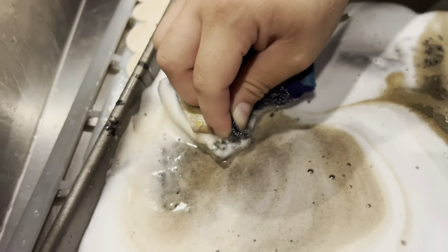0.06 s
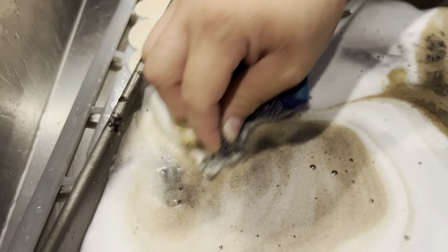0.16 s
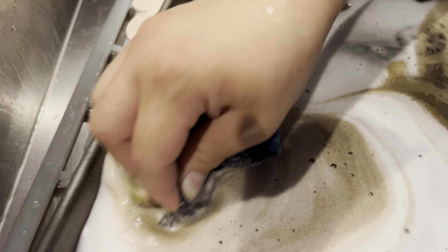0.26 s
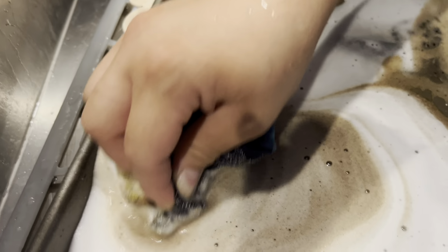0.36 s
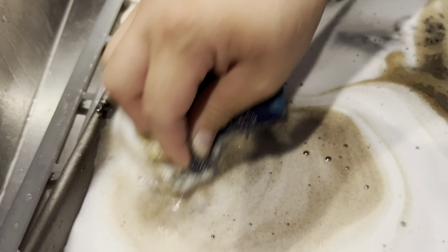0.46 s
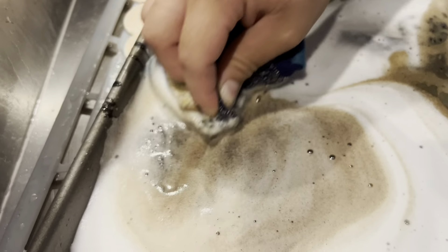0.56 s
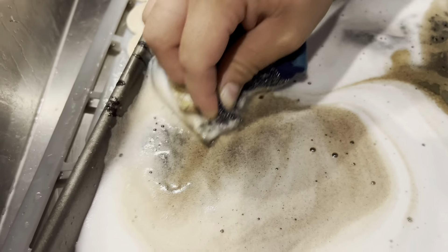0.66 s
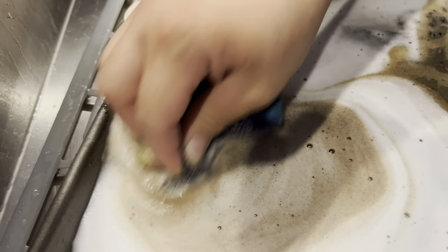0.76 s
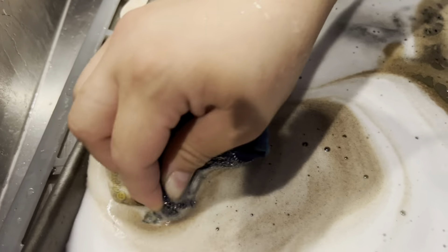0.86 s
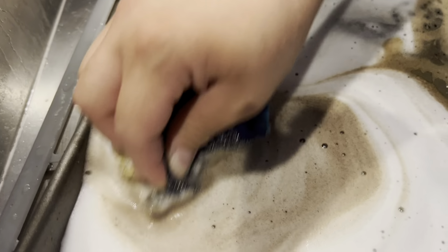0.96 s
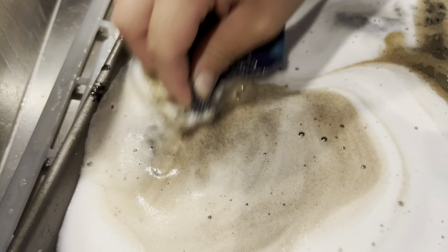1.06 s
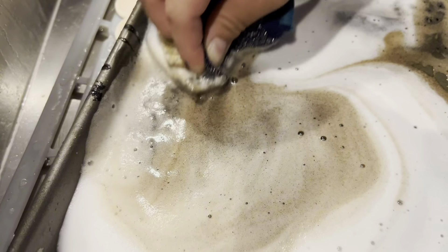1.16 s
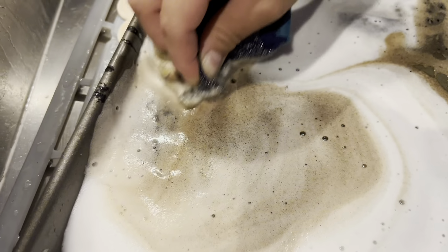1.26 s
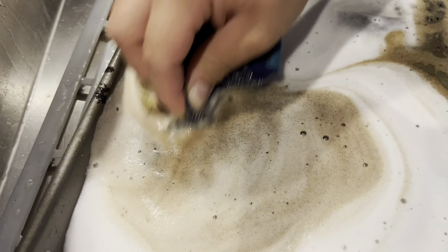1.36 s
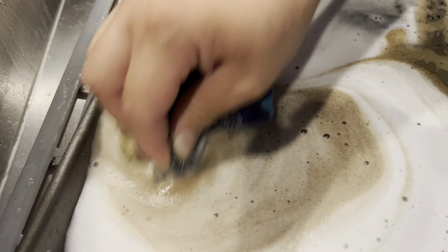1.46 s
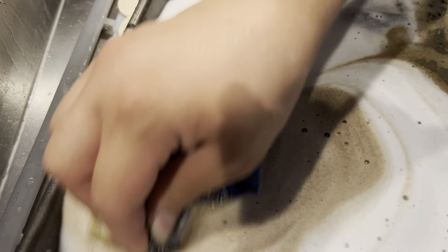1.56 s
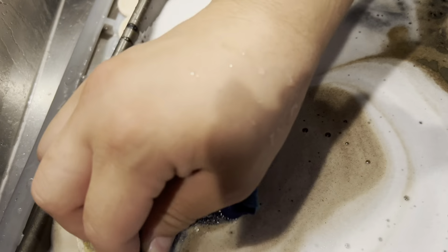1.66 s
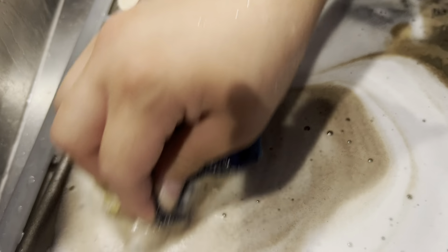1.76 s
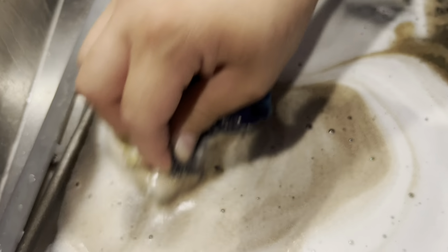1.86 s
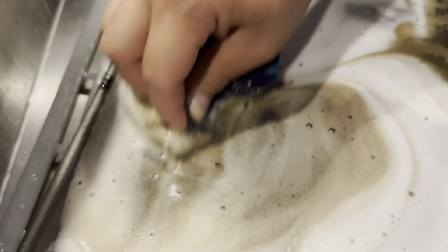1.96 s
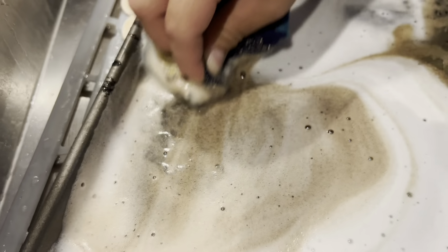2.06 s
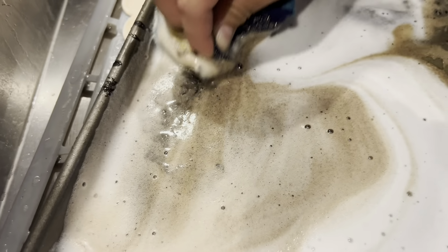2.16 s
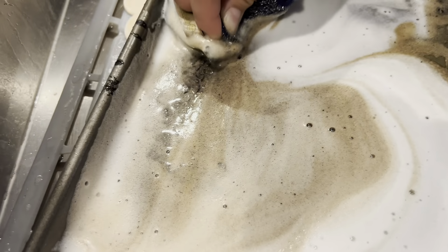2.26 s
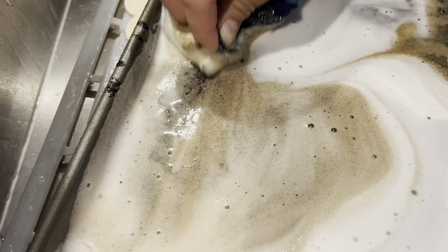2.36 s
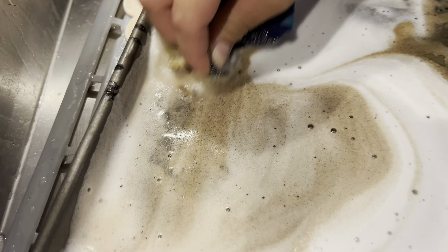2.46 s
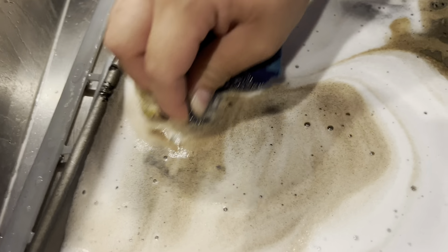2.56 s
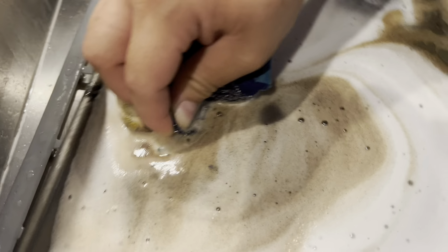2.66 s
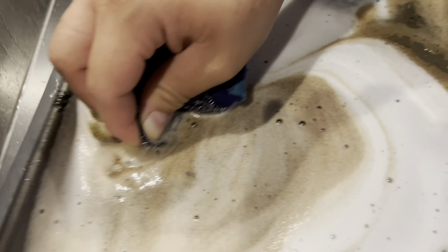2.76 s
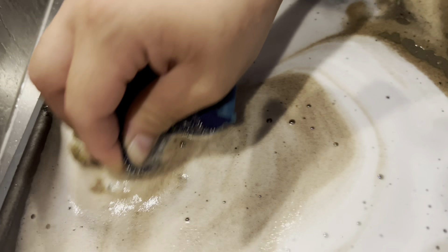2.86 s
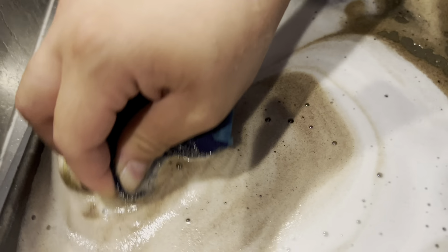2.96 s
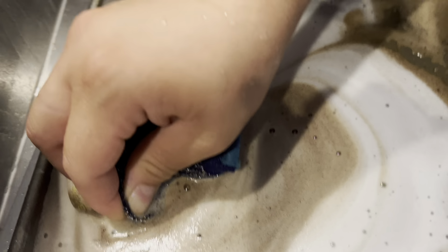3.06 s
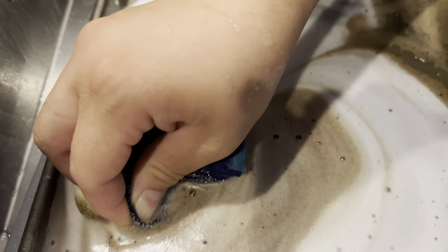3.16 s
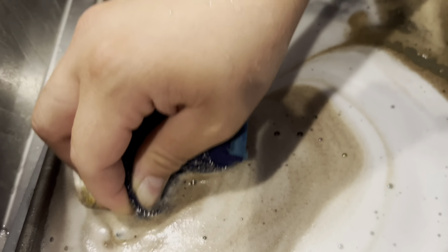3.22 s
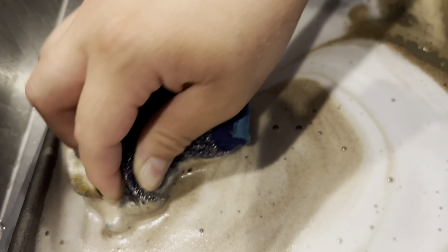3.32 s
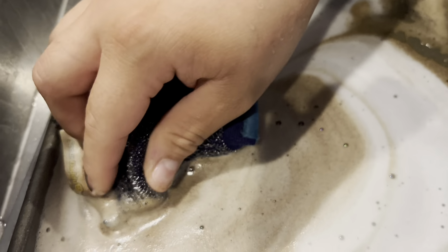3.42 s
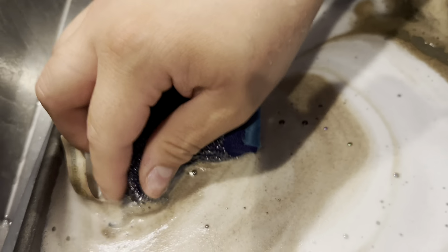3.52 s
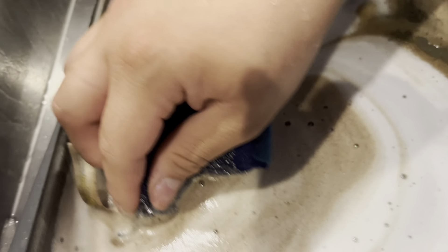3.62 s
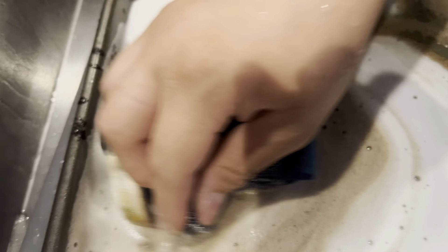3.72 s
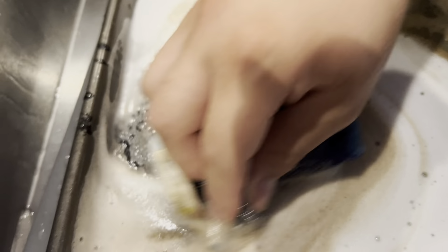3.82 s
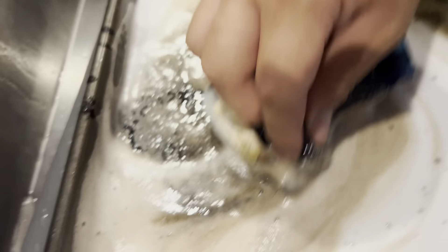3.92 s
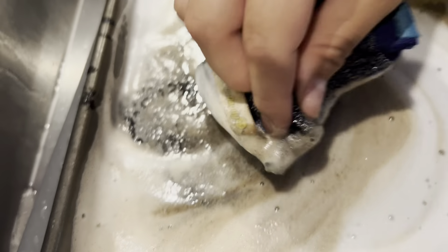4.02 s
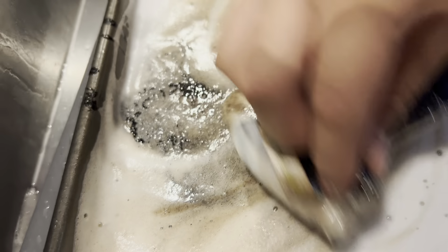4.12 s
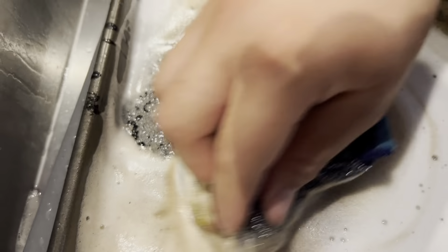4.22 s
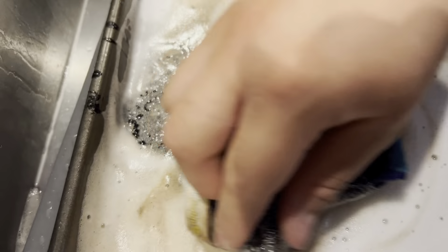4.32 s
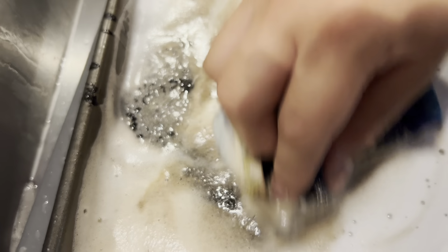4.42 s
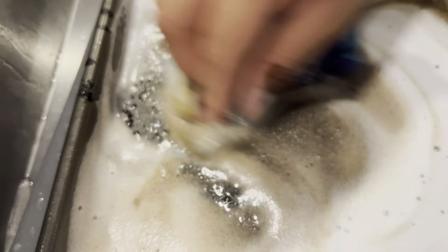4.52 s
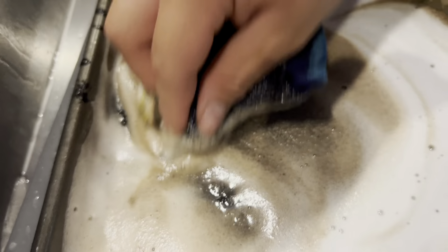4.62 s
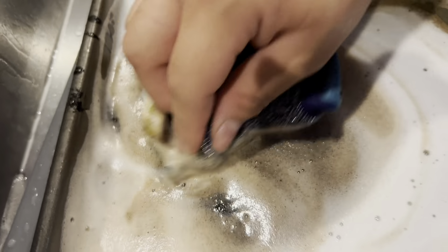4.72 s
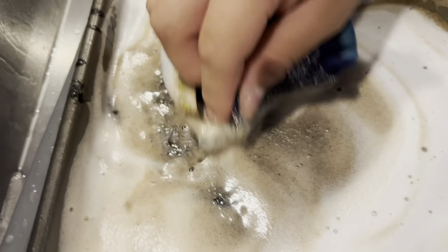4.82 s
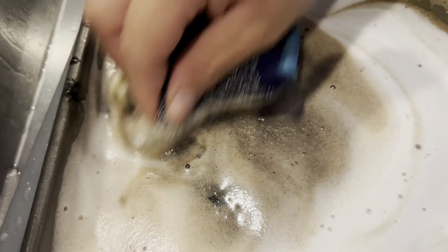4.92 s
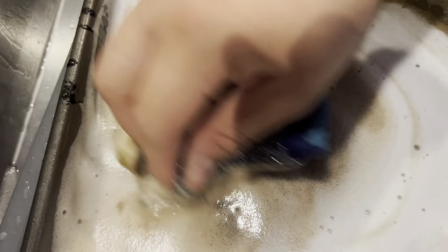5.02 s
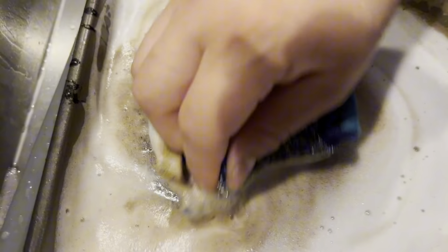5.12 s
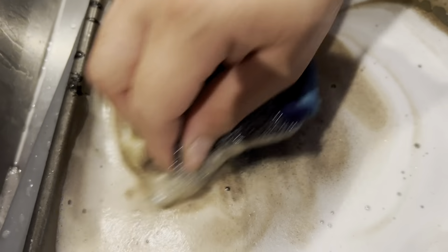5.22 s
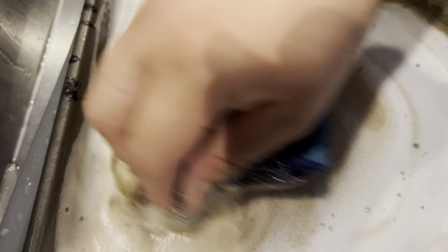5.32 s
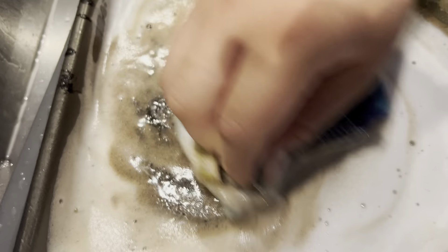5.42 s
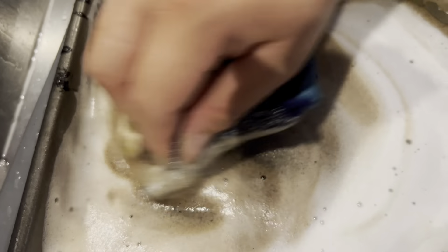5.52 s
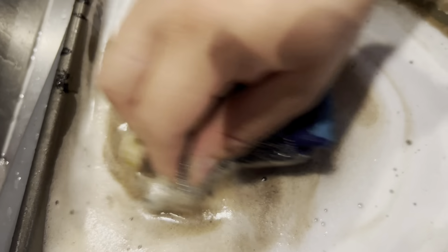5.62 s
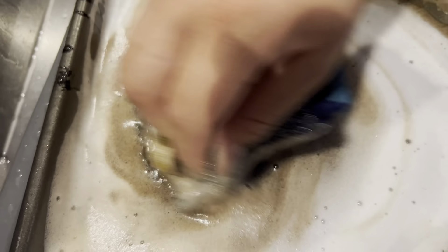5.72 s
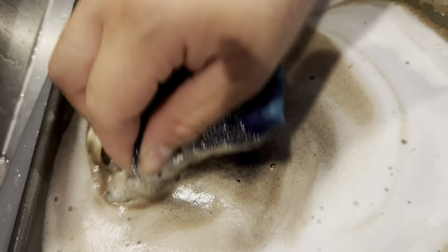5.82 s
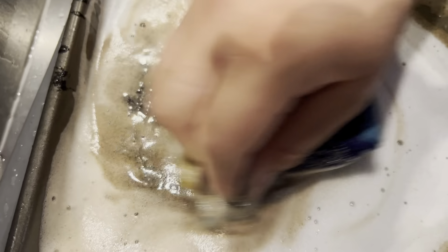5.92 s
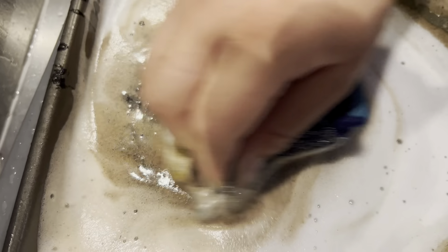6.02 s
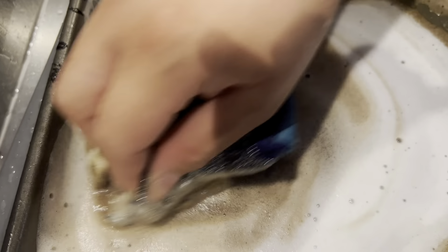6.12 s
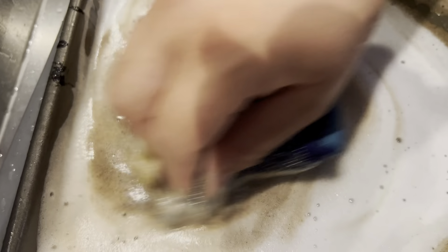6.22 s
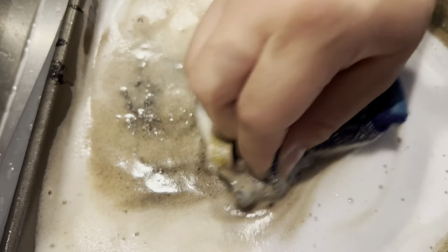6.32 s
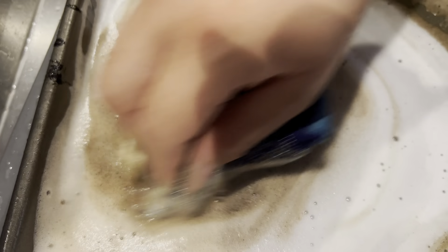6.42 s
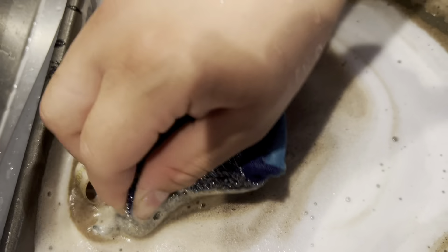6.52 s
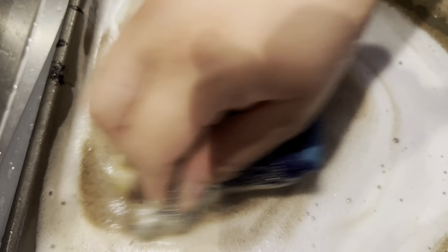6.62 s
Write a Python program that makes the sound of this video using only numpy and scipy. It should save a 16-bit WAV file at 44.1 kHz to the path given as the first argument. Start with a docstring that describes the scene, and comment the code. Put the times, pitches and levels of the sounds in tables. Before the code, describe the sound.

An abrasive sponge scrapes wet metal very near the microphone. Each stroke swells, glides and fades at its turn, combining a bright fibre hiss, a mid-range metallic rasp and dull low shaking of the sheet. About three long strokes every second come first, then a light, quiet lull with tiny ticks, then rapid vigorous scrubbing in a small, dry kitchen space.

```python
"""A scouring sponge scrubs a soapy steel baking sheet in a sink: long strokes, a light pause, then quick ones.
Each stroke speeds up, glides and slows to the turn; scrape, hiss and rumble follow its speed.
Slipping fibres are noise impulses that hiss, rasp and ring the damped sheet; slow flexing modes make the rumble.
Along the way the sponge judders into short gliding groans or jolts the sheet, and the sheet ticks on the sink.
Soap bubbles burst as short decaying sines over a faint noise floor; all is heard close by, in stereo."""
import sys
import numpy as np
from scipy import signal
from scipy.fft import rfft, irfft, next_fast_len
from scipy.io import wavfile
from scipy.ndimage import uniform_filter1d, map_coordinates

SR = 44100
rng = np.random.default_rng(int(sys.argv[2]) if len(sys.argv) > 2 else 0)


def bounce(signal):
    """Save signal as a 16-bit WAV file at the path given by the first command-line argument."""
    frames = np.transpose(np.atleast_2d(signal))
    limited = np.clip(frames, -1, 1)
    pcm = np.round(limited * 32767).astype(np.int16)
    wavfile.write(sys.argv[1], SR, pcm)


N = 294588

# bending modes of the wet sheet: (f/Hz, width/Hz, relative level/dB, left-right/dB, left leads/rad)
SHEET_MODES = [(464.4, 76, -1, 15, 2), (546, 58, -3, 5.5, 1), (692, 30, -1.5, 13, 1.5), (867, 50, 2, 3, -2),
               (976, 122, -4, -6.5, 0.23), (1038, 90, 2, 7, 0), (1107, 24, -6, 4, -0.2),
               (1245, 23, -10.5, -2, -0.8), (1406, 9, -4, 10, -1.5), (1753, 170, -5, 7, 2),
               (2366, 80, -11.5, 2, 1.5), (2440, 19, -9.5, -3, 0.5), (3310, 89, -15, 15, -2),
               (3576, 48, -20, 12, 1), (5010, 175, -13, 6, 1.5)]
# colour of the damped metal: (f/Hz, relative density/dB)
METAL_COLOUR = [(150, 3), (330, -11.5), (450, -1.5), (800, -1), (1100, 1.5), (1400, -1), (2000, -15),
                (3000, -25), (12000, -45)]
# colour of the rasping contact: (f/Hz, relative density/dB)
RASP_COLOUR = [(600, -13.5), (1100, -11.5), (1500, -1.5), (2000, -2), (2700, -4.5), (3600, -7.5),
               (6000, -14.5), (12000, -32)]
# the heavy sheet follows the hand a little late
RUMBLE_LAG_S = 0.013


def amp(db):
    """dB to gain."""
    return 10 ** (np.asarray(db) / 20)


def rms(x):
    """Mean strength of a signal."""
    return np.sqrt(np.mean(x ** 2) + 1e-20)


def unit(x):
    """x brought to rms 1."""
    return x / rms(x)


def along(points, hz):
    """Values between (f/Hz, value) points, on a log frequency axis."""
    f, v = np.transpose(points)
    return np.interp(np.log(hz + 1), np.log(f + 1), v)


def wobble(rate):
    """A smooth random curve, rate knots a second."""
    knots = rng.standard_normal(int(N * rate / SR) + 4)
    return map_coordinates(knots, [np.arange(N) * rate / SR])


def filtered(x, response):
    """x times a complex response of frequency."""
    size = next_fast_len(N + SR // 2)
    f = np.fft.rfftfreq(size, 1 / SR)
    return irfft(rfft(x, size) * response(f), size)[..., :N]


def resonance(f, hz, width):
    """Causal response of one damped mode."""
    return 1j * f * width / (hz * hz - f * f + 1j * f * width)


def placed(balance_db, lead):
    """Left and right gains for a level difference and a phase lead."""
    left = amp(balance_db / 2) * np.exp(.5j * lead)
    return np.array([left, 1 / left]) / np.sqrt((amp(balance_db) + amp(-balance_db)) / 2)


def heard(pair, spectrum):
    """Two unrelated signals, coloured and blended into left and right with set likeness, balance and phase;
    opposite in phase around 10 kHz; rms 1."""
    # left-right likeness: (f/Hz, likeness 0-1)
    alike = [(200, 1), (400, 0.6), (2500, 0.042), (3500, 0.21), (6000, 0.095), (7200, 0.49), (8800, 0.29),
             (9100, 1), (10900, 1), (11600, 0.074), (12200, 0.65), (12500, 0.78), (14300, 1), (14900, .55)]
    # left-right level difference: (f/Hz, balance/dB)
    balance = [(200, -3.5), (450, 4.5), (900, 3), (1300, -3), (1750, 1.5), (2500, 0), (3500, 2.5),
               (4600, 7.5), (5600, 6.5), (6800, 0.8), (9000, 1.78), (12000, -2.5)]
    # left-right phase: (f/Hz, left leads/rad)
    left_lead = [(300, 0), (1000, -1.1), (1700, 2), (3500, 2.5), (4600, 0), (6900, 0.5), (8800, -1.6),
                 (9100, -np.pi), (10900, -np.pi), (12500, -2 * np.pi), (14400, -2 * np.pi), (16000, -9.5)]

    def mid_side(f):
        turn = np.arccos(np.clip(along(alike, f), 0, 1)) / 2
        return amp(along(spectrum, f)) * np.array([np.cos(turn), np.sin(turn)])

    mid, side = filtered(pair, mid_side)
    left_right = np.array([mid + side, mid - side])
    return unit(filtered(left_right, lambda f: placed(along(balance, f), along(left_lead, f))))


def room_floor():
    """Quiet steady noise, coloured to the room's floor, rms 1."""
    # colour of the floor: (f/Hz, relative density/dB)
    floor_colour = [(25, -13), (70, 22), (170, -28), (400, -7), (1500, -34), (5000, -11), (16000, -25)]
    return heard(rng.standard_normal((2, N)), floor_colour)


def kitchen(x, t60=0.069):
    """A short, dull answer of the sink and the walls: x convolved with fading noise."""
    t = np.arange(SR // 3) / SR
    tail = rng.standard_normal((2, len(t))) * amp(-60 * t / t60) * (t > .004)
    answer = signal.fftconvolve(x, tail / np.linalg.norm(tail[0]), axes=1)[:, :N]
    return filtered(answer, lambda f: 1 / (1 + (f / 6500) ** 8))


def foam():
    """Bubbles burst at random in the suds, each a few damped cycles; they show when the sponge is quiet."""
    pops_per_s, centre_hz = 80, 1500  # pitch spreads an octave either way
    decay_cycles = 2.5  # cycles to fall to 1/e
    base_db, spread_db = -61, 3.5
    count, t = int(pops_per_s * N / SR), np.arange(SR // 100) / SR
    when, pitch, size, side = rng.random((count, 4)).T[..., None]
    cycles = centre_hz * 2 ** (2 * pitch - 1) * t
    level = amp(base_db - spread_db * np.log(size + .05))
    pops = level * np.exp(-cycles / decay_cycles) * np.sin(2 * np.pi * cycles)
    at = ((when * N).astype(int) + np.arange(len(t))).ravel()
    return np.array([np.bincount(at, (pops * np.sqrt(share)).ravel(), N)[:N] for share in (side, 1 - side)])


def sheet(force):
    """Each mode of the sheet has its own level and phase left and right; the ringing is rolled off above 6.8 kHz."""
    def ringing(f):
        total = 0
        for k, (hz, width, db, pan, lead) in enumerate(SHEET_MODES):
            # neighbouring modes alternate in sign
            total = total + amp(db) * (-1) ** k * placed(pan, lead)[:, None] * resonance(f, hz, width)
        return total / (1 + (f / 6800) ** 12)

    return filtered(force, ringing)


def ticks():
    """Short contacts with the sink crack as noise, and knock on the sheet's lowest bending mode."""
    # contacts, levels ahead of colour and mix: (t/s, crack level/dB, knock level/dB)
    contacts = [(1.427, -20, -31), (2.721, -43, -34), (3.025, -32.5, -60), (3.293, -37, -43),
                (3.549, -32, -64), (3.617, -31, -40), (4.095, -36, -41.5)]
    crack_t60_s, knock_t60_s = 0.022, 0.038
    lowest_hz = SHEET_MODES[0][0]
    blows, knocks = np.zeros((2, N + SR)), np.zeros(N + SR)
    t = np.arange(SR // 10) / SR
    for s, crack_db, knock_db in contacts:
        start = round(s * SR)
        stop = start + len(t)
        blows[:, start:stop] += amp(crack_db - 60 * t / crack_t60_s) * rng.standard_normal((2, len(t)))
        knocks[start:stop] += amp(knock_db - 60 * t / knock_t60_s) * np.sin(2 * np.pi * lowest_hz * t)
    crack = filtered(blows[:, :N], lambda f: amp(along(METAL_COLOUR, f)) + amp(along(RASP_COLOUR, f)))
    ring = amp(4) * sheet(blows[0, :N])
    return crack + ring + knocks[:N] * amp([[2], [-3]])  # knock leans left


def stroke_speed(t, length, rise, fall):
    """Speed 0-1 of the sponge, t seconds into a stroke: it speeds up, glides and slows to the turn."""
    ramp = lambda u: np.sin(np.pi / 2 * np.clip(u, 0, 1))
    return ramp(t / rise) * ramp((length - t) / fall)


def settled(power, settle_db, rest_db):
    """Level in dB of a rubbing power, with the fading tail of settling fibres and sheet, over a resting level."""
    settle_s = 0.038
    keep = np.exp(-1 / (settle_s * SR))
    tail = signal.lfilter([1 - keep], [1, -keep], power)
    return 10 * np.log10(power + amp(settle_db) ** 2 * tail + amp(rest_db) ** 2)


def stroke_levels():
    """Levels in dB of scrape, hiss and rumble: all three follow the sponge's speed, and jolts add to the rumble."""
    # each push or pull, levels at full speed ahead of the mix:
    # (t/s, length/s, speed-up/s, slow-down/s, scrape level/dB, hiss level/dB, rumble level/dB)
    strokes = [(-0.063, 0.15, 0.03, 0.11, -42, -42, -47.5), (0.071, 0.26, 0.12, 0.11, -35.5, -34.5, -35),
               (0.336, 0.33, 0.11, 0.21, -37.5, -39.5, -38.0),
               (0.614, 0.26, 0.11, 0.11, -33.5, -35.0, -38.0),
               (0.89, 0.3, 0.14, 0.099, -36.0, -38.5, -42.0), (1.203, 0.48, 0.17, 0.22, -33.0, -35, -37),
               (1.66, 0.63, 0.095, 0.15, -39, -40, -43), (2.276, 0.38, 0.26, 0.11, -34.5, -35.5, -36.5),
               (2.678, 0.35, 0.18, 0.17, -35.0, -39.5, -38.5),
               (3.151, 0.32, 0.15, 0.159, -52.5, -52.5, -54.5),
               (3.419, 0.29, 0.1, 0.075, -54, -54.5, -57.5), (3.61, 0.41, 0.099, 0.24, -37, -41.0, -43.5),
               (4.07, 0.13, 0.035, 0.091, -49.5, -48, -59.5), (4.148, 0.14, 0.06, 0.083, -38.5, -40.5, -49),
               (4.243, 0.22, 0.19, 0.052, -38, -42.5, -43.5),
               (4.379, 0.2, 0.15, 0.052, -36.0, -36.0, -48.5),
               (4.549, 0.11, 0.063, 0.023, -40.5, -40.0, -46.5),
               (4.601, 0.25, 0.19, 0.042, -40.5, -42.5, -45.5),
               (4.813, 0.14, 0.069, 0.082, -37.5, -36, -43.0),
               (4.888, 0.22, 0.081, 0.085, -32.0, -36.5, -38.5),
               (5.036, 0.19, 0.12, 0.061, -41.5, -43.0, -44.5),
               (5.176, 0.14, 0.071, 0.077, -35.5, -38.5, -42),
               (5.277, 0.193, 0.065, 0.12, -33, -36.0, -38.5),
               (5.401, 0.17, 0.087, 0.061, -33.5, -36.5, -38),
               (5.549, 0.16, 0.089, 0.07, -35, -38.5, -37.5),
               (5.687, 0.151, 0.086, 0.071, -31.5, -35.5, -40),
               (5.807, 0.19, 0.102, 0.096, -32.5, -36, -35.5), (5.974, 0.18, 0.11, 0.054, -33, -35.0, -40),
               (6.134, 0.23, 0.12, 0.12, -33.5, -37.0, -41), (6.334, 0.2, 0.092, 0.052, -33, -34.5, -35.5),
               (6.533, 0.16, 0.13, 0.02, -33, -35.5, -40.5)]
    # the sponge grabs and jolts the sheet: (t/s, peak level/dB)
    jolts = [(0.363, -32), (1.892, -45), (2.106, -38), (2.37, -30), (2.863, -40), (3.742, -34.5),
             (4.084, -39.0), (4.733, -36.5), (5.39, -41.5), (6.219, -33)]
    jolt_rise_s = 0.033  # swells for this long, then dies away
    # strength grows as these powers of speed
    scrape_power, hiss_power, rumble_power = 1.49, 1.3, 1.36
    t = np.arange(N) / SR
    scrape, hiss, shake = np.zeros((3, N))
    for s, length, rise, fall, scrape_db, hiss_db, rumble_db in strokes:
        on = (t > s) & (t < s + length + RUMBLE_LAG_S)
        age = t[on] - s
        speed = stroke_speed(age, length, rise, fall)
        late_speed = stroke_speed(age - RUMBLE_LAG_S, length, rise, fall)
        scrape[on] += (amp(scrape_db) * speed ** scrape_power) ** 2
        hiss[on] += (amp(hiss_db) * speed ** hiss_power) ** 2
        shake[on] += (amp(rumble_db) * late_speed ** rumble_power) ** 2
    for s, peak_db in jolts:
        u = np.clip((t - s) / jolt_rise_s, 0, 20)
        shake += (amp(peak_db) * u * np.exp(1 - u)) ** 2
    return (settled(scrape, settle_db=-17.5, rest_db=-67.5),
            settled(hiss, settle_db=-16, rest_db=-65.5),
            settled(shake, settle_db=-7.5, rest_db=-59))


def rumble(rumble_db):
    """The dragging sponge shakes the sheet's slow modes; when it judders, the shaking turns into a short groan."""
    # slow flexing of the whole sheet: (f/Hz, width/Hz, relative level/dB)
    flex_modes = [(56.3, 16.6, -10.5), (83.6, 15.4, -4), (115, 21, -2.5), (153, 27.3, 0), (178.9, 33.2, 0),
                  (211.5, 47.6, -7), (297.6, 53, -13.5)]
    # the drag locks into a cycle: (t/s, length/s, first f/Hz, last f/Hz, locked share 0-1)
    judders = [(.17, 0.15, 154, 189, 0.75), (.372, 0.054, 142, 214, 0.15), (.4, 0.29, 177.4, 172.6, 0.65),
               (.7, 0.092, 182, 153, 0.85), (1.34, 0.067, 144, 179, 0.4), (1.74, .2, 154.7, 193, 0.64),
               (2.37, 0.035, 296, 255, 0.45), (2.39, 0.094, 211, 178, 0.47), (2.49, 0.2, 85, 77, 0.35),
               (2.87, 0.24, 131.7, 87, .7), (3.74, 0.12, 159, 150, 0.75), (4.08, 0.188, 165, 192, 0.7),
               (4.73, 0.32, 155.4, 145.7, 0.6), (5.87, 0.081, 177.3, 148, 0.6),
               (6.25, 0.17, 146, 115, 0.72), (6.4, 0.21, 79.2, 84.5, 0.46)]
    # the deepest flexing builds up later and more weakly
    deep_hz, deep_lag_s, deep_gain_db = 125, 0.037, -2

    def flexing(f):
        modes = sum(amp(db) * (-1) ** k * resonance(f, hz, width) for k, (hz, width, db) in enumerate(flex_modes))
        return modes / (1 + (f / 380) ** 4)

    drag = unit(filtered(rng.standard_normal(N), flexing))
    # even out the random swells of the narrow-band drag noise
    swell = np.abs(uniform_filter1d(drag ** 2, size=1500))
    drag = unit(drag / np.sqrt(swell + 0.023))
    t = np.arange(N) / SR
    unsteady = 0.66 * wobble(45)  # phase wander of the groans, rad
    for s, length, first_hz, last_hz, share in judders:
        u = np.clip((t - s) / length, 0, 1)
        cycles = length * (first_hz * u + (last_hz - first_hz) * u * u / 2)
        groan = np.sqrt(2) * np.sin(2 * np.pi * cycles + unsteady)
        locked = np.clip(share, 0, 1) * np.clip(8 * u * (1 - u), 0, 1)
        drag = np.sqrt(1 - locked) * drag + np.sqrt(locked) * groan
    deep = filtered(drag, lambda f: 1 / (1 + (f / deep_hz) ** 8))
    deep_db = np.interp(t - deep_lag_s, t, rumble_db) + deep_gain_db
    shaking = deep * amp(deep_db) + (drag - deep) * amp(rumble_db)
    return shaking * amp([[-.5], [.5]])


def slips(density, scatter_db):
    """Tiny fibre slips, density a second, of uneven size; three unrelated radiation paths, rms 1."""
    chance = np.clip(density / SR, 1e-4, 1)
    happens = rng.random(N) < chance
    # rarer slips are larger, so density alone leaves the mean power alone
    size = happens * amp(scatter_db * rng.standard_normal(N)) / np.sqrt(chance)
    return unit(size * rng.standard_normal((3, N)))


def roaming(x, depth_db):
    """As the sponge travels it crosses the nodes of the sheet's many small modes, which swell and fade in turn."""
    z = signal.stft(x, nperseg=1024)[2]
    across_pitch = uniform_filter1d(rng.standard_normal(z.shape), size=3, axis=-2)
    field = uniform_filter1d(across_pitch, size=9, axis=-1)
    moved = signal.istft(z * amp(depth_db * unit(field)), nperseg=1024)[1][..., :N]
    return unit(moved) * np.sqrt(np.mean(x ** 2))


def scrubbing(scrape_db, hiss_db):
    """A faster stroke makes more slips; clumps of fibres catch together, so the rasp flutters."""
    # colour of the fibres: (f/Hz, relative density/dB)
    hiss_colour = [(700, -29), (2000, -16), (3000, -3.5), (4400, 3.5), (5300, 2.4), (6500, 0), (8500, -.5),
                   (9500, -2), (12500, -4), (15500, -3)]
    density = 24000 * amp(.6 * (hiss_db + 36))  # slips a second
    clumps = wobble(110)
    surges = wobble(36)  # stiffer strands dig into the metal for a moment

    force = roaming(slips(density, scatter_db=3.0), depth_db=2.5)
    force = force * amp(scrape_db + 1.5 * clumps + 0.51 * surges)
    ring = amp(-2.0) * unit(sheet(force[2]))
    scrape = amp(-3.0) * heard(force[:2], METAL_COLOUR)
    metal = rms(force) * (ring + scrape)

    # the contact rasps with both the pressure on the metal and the speed of the fibres
    contact = roaming(slips(density, scatter_db=3.5), depth_db=3.5)
    contact = contact * amp((scrape_db + hiss_db) / 2 + 0.56 * clumps + 1.1 * surges)
    rasp = amp(-3.5) * rms(contact) * heard(contact[:2], RASP_COLOUR)

    fine = roaming(slips(density, scatter_db=2.0), depth_db=3.5) * amp(hiss_db + 0.66 * clumps)
    fibres = amp(0.02) * rms(fine) * heard(fine[:2], hiss_colour)
    # suds and fingers shade the top of the hiss now more, now less
    top = filtered(fibres, lambda f: 1 / (1 + (8000 / (f + 1)) ** 4))
    shading = top * (amp(0.72 * wobble(11)) - 1)
    return metal + rasp + fibres + shading


def scene():
    """The scrubbing close by, its answer from the kitchen, bursting foam and a quiet room floor."""
    scrape_db, hiss_db, rumble_db = stroke_levels()
    # the hand's pressure wavers, and the rumble with it
    waver_db = 1.3 * wobble(16)
    near = scrubbing(scrape_db, hiss_db) + rumble(rumble_db + waver_db) + ticks()
    return near + amp(-15.5) * kitchen(near) + amp(-59.5) * room_floor() + foam()


def record(dry):
    """Shed the deepest bass and keep nothing above the band limit."""
    top_hz, bass_hz = 15780, 29
    return filtered(dry, lambda f: (f < top_hz) * f ** 4 / (f ** 4 + bass_hz ** 4))


dry = scene()
out = record(dry)
bounce(out)
```